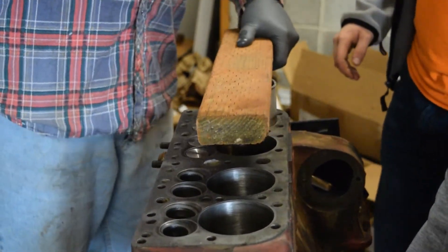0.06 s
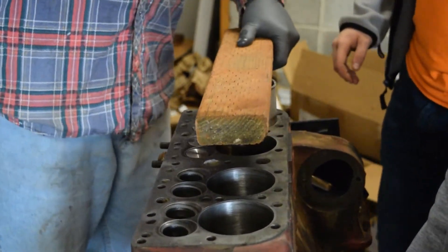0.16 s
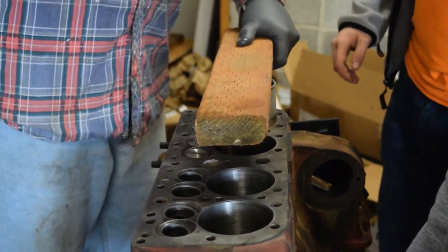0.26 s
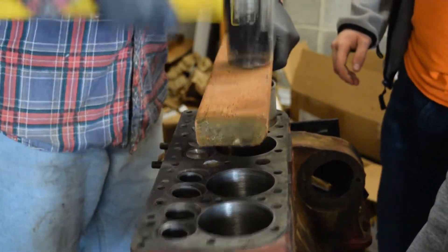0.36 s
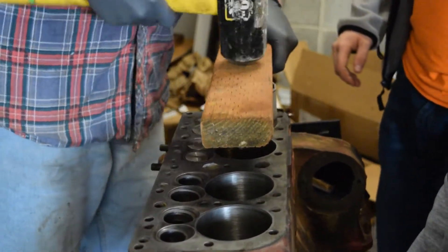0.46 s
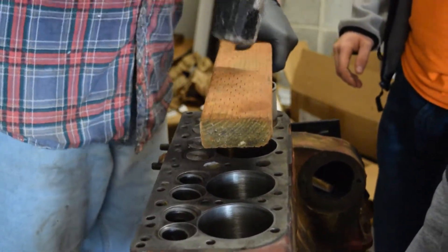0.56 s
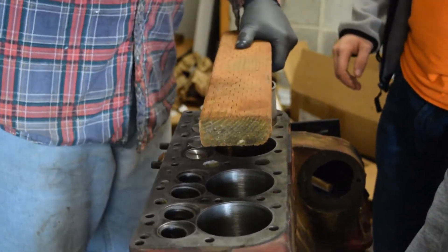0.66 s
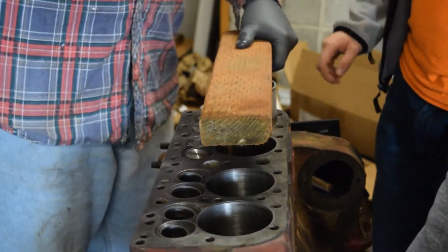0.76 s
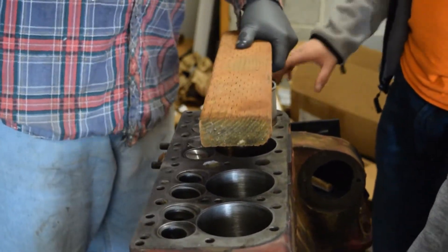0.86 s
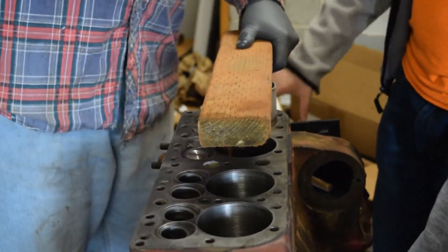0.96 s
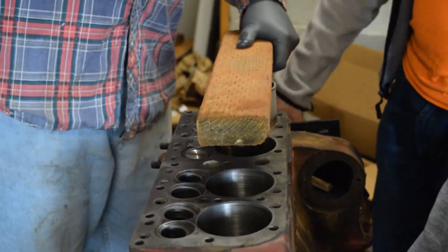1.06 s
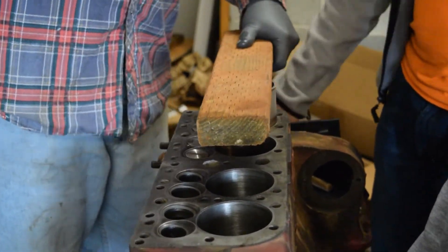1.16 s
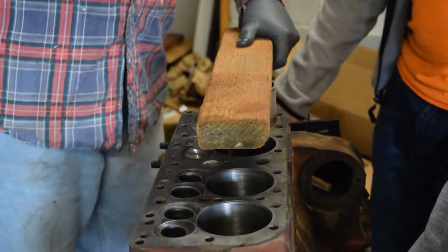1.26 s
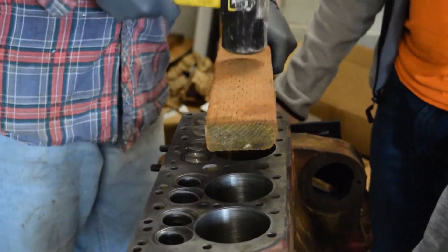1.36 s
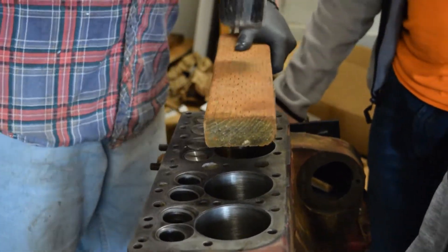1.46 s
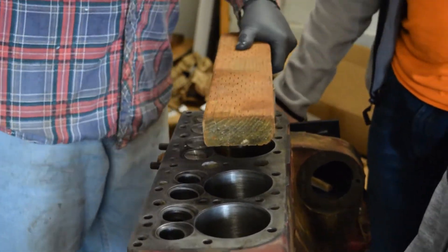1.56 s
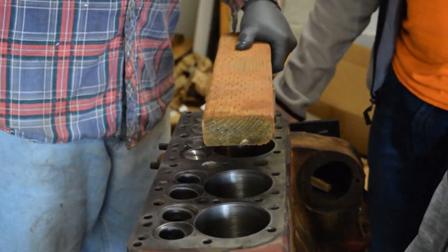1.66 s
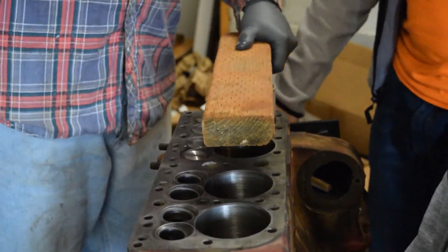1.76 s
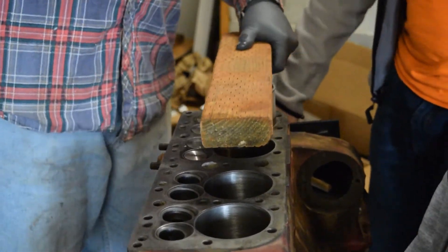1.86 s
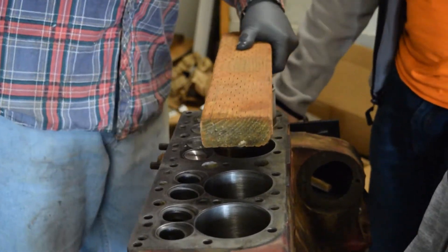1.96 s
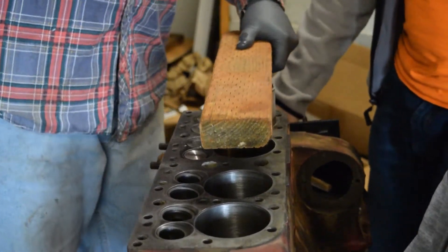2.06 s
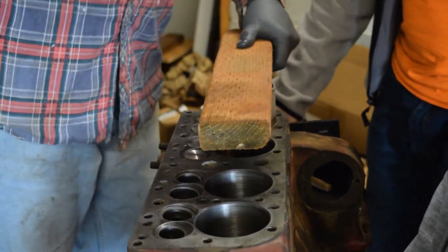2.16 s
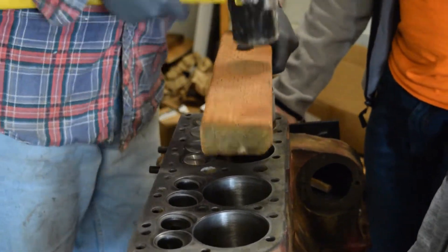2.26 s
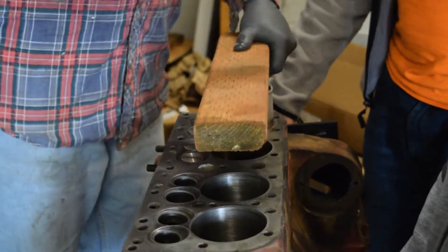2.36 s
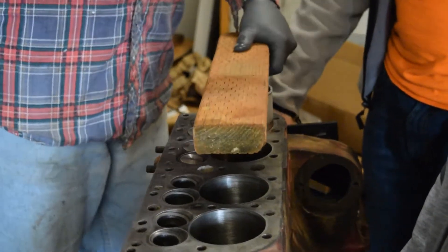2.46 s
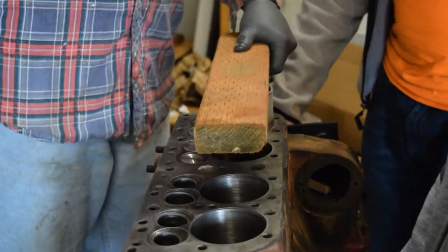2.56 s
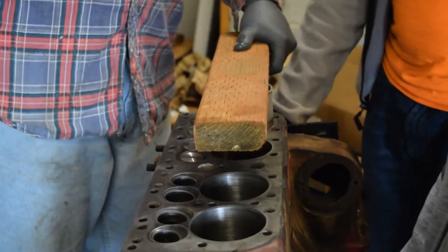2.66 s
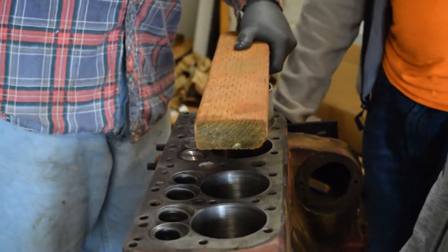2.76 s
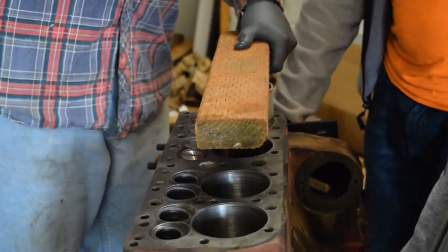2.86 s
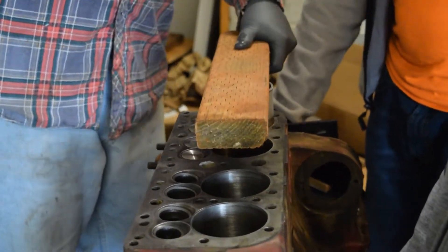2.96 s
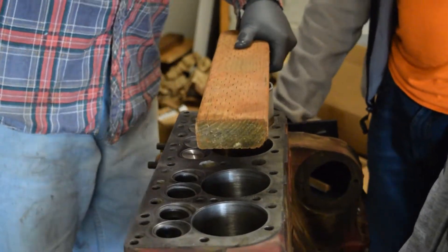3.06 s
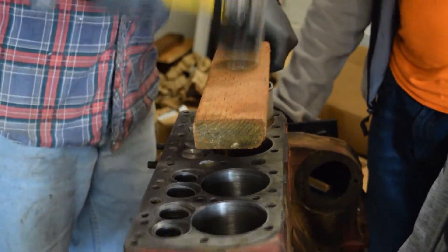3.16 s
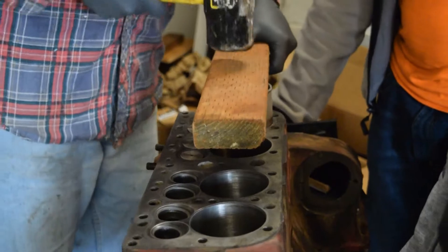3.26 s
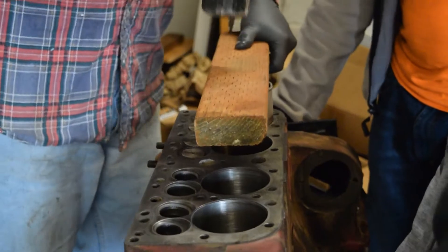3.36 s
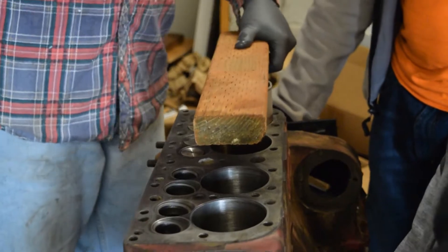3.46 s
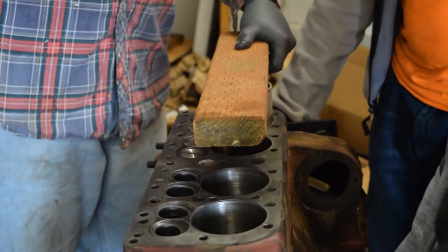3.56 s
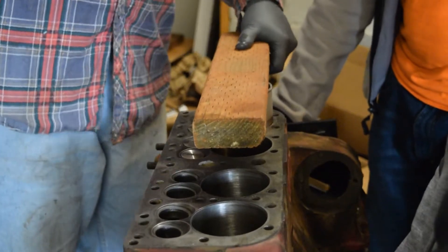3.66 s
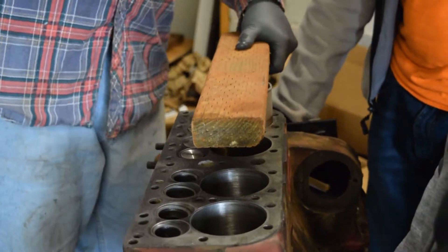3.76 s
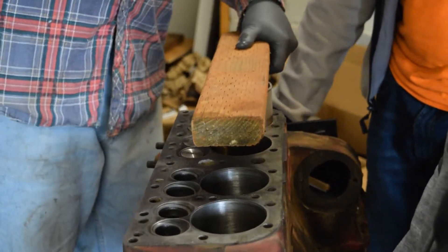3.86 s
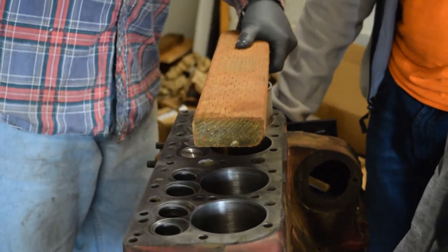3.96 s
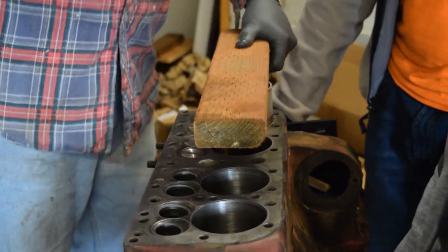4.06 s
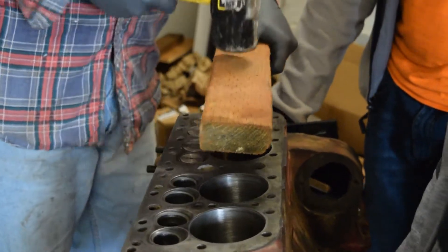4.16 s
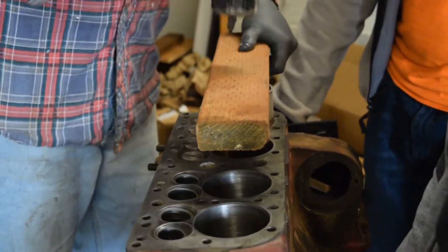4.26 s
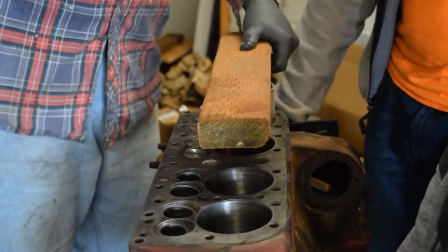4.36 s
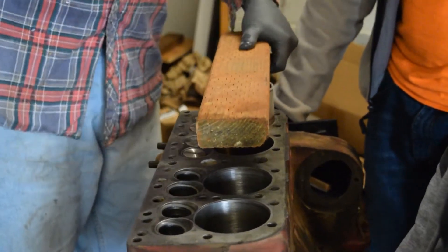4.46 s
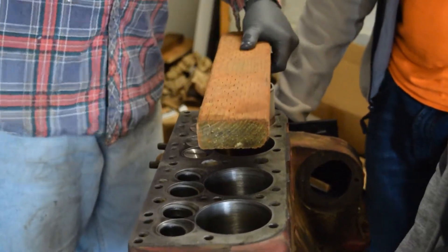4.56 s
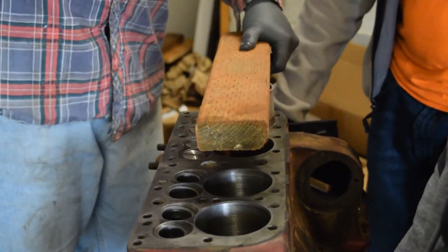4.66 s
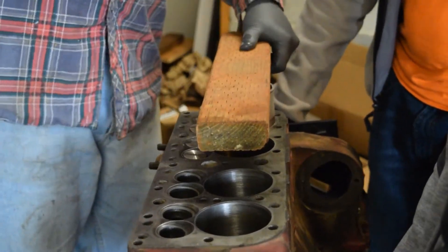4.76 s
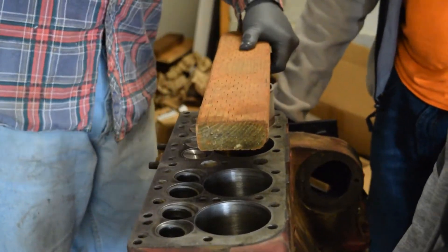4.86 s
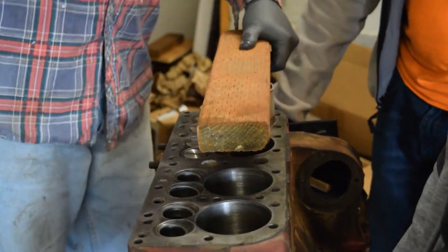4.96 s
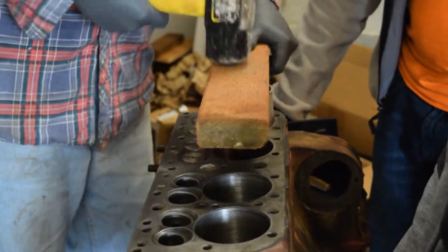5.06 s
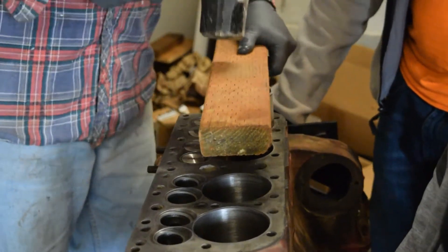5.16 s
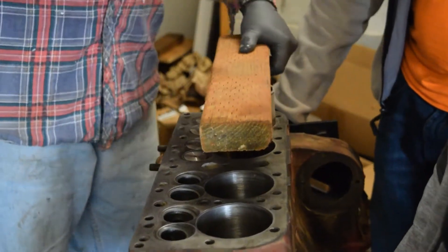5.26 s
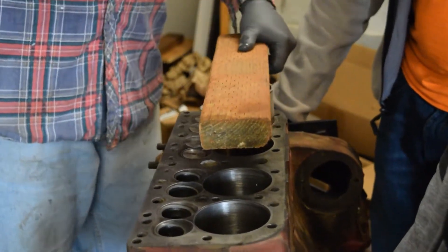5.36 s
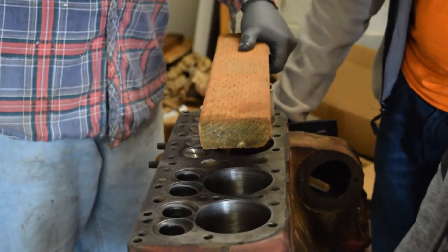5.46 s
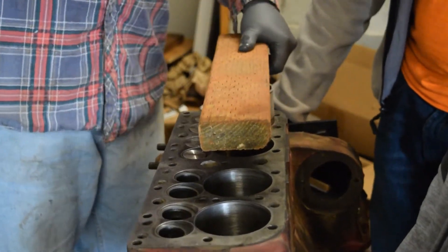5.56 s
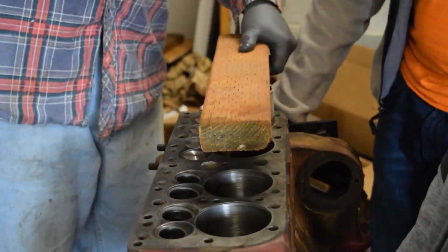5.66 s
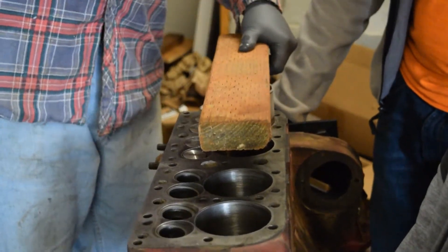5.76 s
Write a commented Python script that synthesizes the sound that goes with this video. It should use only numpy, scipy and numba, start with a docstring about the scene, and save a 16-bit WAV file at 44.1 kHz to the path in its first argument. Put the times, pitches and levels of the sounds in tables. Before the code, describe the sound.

A heavy hammer steadily strikes wood on an iron engine block, each loud, distorted knock clanging and decaying in a hard-walled room.

```python
"""Hammer blows on an engine block.

A heavy hammer drives a sleeve into a cast-iron block through timber: six blows and the tail of an earlier one.
Each knocks the timber (modes), slips the sleeve (noise burst), rings the iron (modes), fills the hard-walled
workshop (decaying noise). Metal clinks (high modes), cloth rustles and air are noise or modes too; a far
machine coasts down (sliding sines). The close microphone clips on blows until its gain control catches up."""
import sys
import numpy as np
from scipy import signal
from scipy.fft import rfft, irfft
from scipy.io import wavfile
from numba import njit

SR = 44100
rng = np.random.default_rng(int(sys.argv[2]) if len(sys.argv) > 2 else 0)


def unload_wav(signal):
    """Save mono or channel-first audio to the path in sys.argv[1] as 16-bit WAV at rate SR, clipped to [-1, 1]."""
    wavfile.write(
        sys.argv[1],
        SR,
        np.round(np.clip(np.atleast_2d(signal).T, -1, 1) * 32767).astype(np.int16),
    )


N = 256645
TIME = np.arange(N) / SR
AGE = TIME[:64000]  # time since a hit, s


def undb(db):
    """Decibels to gain."""
    return 10 ** (np.asarray(db) / 20)


def along(table, hz):
    """Interpolate (f/Hz, value) points on a log-frequency axis."""
    f, value = np.transpose(table)
    return np.interp(np.log(hz + 1), np.log(f), value)


def shape(x, colour):
    """Filter x by a (f/Hz, gain/dB) curve, zero phase."""
    hz = np.fft.rfftfreq(len(x), 1 / SR)
    return irfft(rfft(x) * undb(along(colour, hz)), len(x))


def colour_of(hit, colour):
    """Filter a hit, zero-padded so that its attack does not wrap round."""
    padded = np.pad(hit, (0, len(hit)))
    return shape(padded, colour)[:len(hit)]


def noise(colour, size):
    """Coloured noise of rms 1."""
    x = shape(rng.standard_normal(size), colour)
    return x / x.std()


def fade(t60_s):
    """Exponential decay: 60 dB in t60_s."""
    return np.exp(-np.log(1000) * AGE / t60_s)


def ring(modes):
    """Sum of decaying sines (f/Hz, level/dB, t60/s), random phase."""
    total = 0
    for hz, db, t60_s in modes:
        phase_turns = rng.random()
        total = total + undb(db) * fade(t60_s) * np.sin(2 * np.pi * (hz * AGE + phase_turns))
    return total


def add(out, start_s, x):
    """Mix x in from start_s; drop what falls outside."""
    start = int(start_s * SR)
    x, start = x[max(-start, 0):], max(start, 0)
    out[start:start + len(x)] += x[:N - start]


# hammer blows: t/s, force/dB, knock/dB, slip/s, body/dB, middle/dB, brightness/dB, three long rings/dB each
STROKES = [(-0.53, 0.5, 0, 0.008, 9.5, 6.5, -5, -1.5, -14, -3.5),
           (0.4045, 0.75, -1.5, 0.0054, -5.5, 0, 1, -3, 11.5, 5),
           (1.3516, -0.84, 0, 0.0068, -1.5, 1.5, 3, -3.5, 7.5, 7.5),
           (2.2651, -1.05, -0.5, 0.0067, -2, 3, -6.5, 3, 3.5, 10),
           (3.2114, -2.5, -2.5, 0.009, -1.5, 2, 0.5, -2, -14.5, -5),
           (4.1580, 0.3, -2.9, 0.0056, 2, -0.5, -1, 1, -12, -6.5),
           (5.0880, -1, -1.5, 0.008, -4.5, 1.5, 2, -8.5, -4.5, 3)]


def add_blows(out):
    """All blows share one casting ripple; the first starts before t = 0, so only its tail is heard."""
    ripple = casting_ripple()
    for t_s, *stroke in STROKES:
        add(out, t_s, blow(ripple, *stroke))


def blow(ripple, force_db, knock_db, slip_s, body_db, middle_db, bright_db, *ring_db):
    """Timber knocks, sleeve slips, block thumps, iron clangs, room answers; force scales the sum."""
    toned = timber_knock(knock_db) + iron_clang() + room_answer(ripple)
    # soft contact feeds the lows, hard contact the treble: f/Hz, gain/dB
    tint = [(250, 0), (450, body_db), (650, body_db), (850, middle_db), (1200, middle_db),
            (1500, 0), (1900, bright_db), (3200, 0)]
    struck = colour_of(toned, tint)
    return undb(force_db) * (sleeve_crack(slip_s) + block_thump() + struck + long_rings(ring_db))


# timber modes: f/Hz, level/dB, t60/s
TIMBER_MODES = [(335, -20, 0.052), (614, -1.5, 0.29), (857, 10.5, 0.033), (1067, -4, .08),
                (1412.5, 2, 0.13), (1742, -1.5, 0.12)]


def timber_knock(knock_db):
    """Damped modes of the struck timber."""
    return undb(3 + knock_db) * ring(TIMBER_MODES)


# slipping sleeve: f/Hz, relative density/dB per Hz
SLIP_COLOUR = [(300, -7.5), (1800, 0.5), (5000, -1), (15000, -12)]


def sleeve_crack(slip_s):
    """Short harsh slip: noise held about slip_s, then cut by a fourth-power exponential."""
    envelope = np.exp(-(AGE / slip_s) ** 4)
    return undb(3) * noise(SLIP_COLOUR, len(AGE)) * envelope


# block thump: f/Hz, relative density/dB per Hz
BLOCK_COLOUR = [(25, -0.5), (100, -0.5), (200, -8.5), (700, -40.5)]


def block_thump():
    """Low noise with a short exponential decay."""
    return undb(-7.5) * noise(BLOCK_COLOUR, len(AGE)) * fade(0.07)


# damped block modes: f/Hz, relative level/dB
IRON_MODES = [(258, -18.5), (312, -17), (441, -8), (555, -8), (620, -8.5), (673, -9), (845, -11.5),
              (1097, -14), (1174, -10), (1217, -7.5), (1324, -2.5), (1442, -2), (1508, -4.5), (1766, -3),
              (1807, -2.5), (1857, -3), (1909, -3.5), (2053, -3.5), (2505, -10), (2789, -16.5), (3090, -14),
              (3450, -12.5), (4081, -18.5), (4242, -15.5), (4689, -14.5), (5179, -18), (5728, -18.5),
              (6024, -24), (7461, -30), (8980, -31)]
IRON_T60_S, IRON_KNEE_HZ, IRON_DAMPING_POWER = 0.65, 1810, 0.093
IRON_SCATTER_DB = 3


def iron_clang():
    """Timber seats anew per blow, so mode levels scatter; t60 falls as a power of f above the knee."""
    modes = []
    for (hz, db), share in zip(IRON_MODES, rng.standard_normal(len(IRON_MODES))):
        t60_s = IRON_T60_S * min(1, IRON_KNEE_HZ / hz) ** IRON_DAMPING_POWER
        modes.append((hz, db + IRON_SCATTER_DB * share, t60_s))
    return undb(-5.5) * ring(modes)


# long iron rings: f/Hz, level/dB, t60/s
LONG_RINGS = [(1614, -15, 1.18), (1664, -21, 1.04), (2199, -24.5, 1.85)]


def long_rings(ring_db):
    """Slow-decaying iron modes, level set per blow."""
    return ring([(hz, db + own_db, t60_s) for (hz, db, t60_s), own_db in zip(LONG_RINGS, ring_db)])


def casting_ripple(count=520, ripple_db=3.0):
    """Crowded upper modes as a random (f/Hz, gain/dB) curve, 0 dB at both ends."""
    hz = np.linspace(SR / 20, SR / 3, count)
    gain_db = ripple_db * np.pad(rng.standard_normal(count - 2), 1)
    return np.column_stack([hz, gain_db])


# room's answer to a blow: f/Hz, relative density/dB per Hz
ROOM_COLOUR = [(40, -66.5), (120, -23.5), (200, -29), (270, -18), (450, -4), (950, -7), (1350, 0.5),
               (1900, 1.5), (2400, -8.5), (4500, -18), (9000, -30.5), (15000, -46)]


def room_answer(ripple):
    """Reverberant noise in the blow's colour, rippled by the casting."""
    excitation = shape(noise(ROOM_COLOUR, len(AGE)), ripple)
    return undb(6.5) * reverberate(excitation)


# workshop decay: f/Hz, t60/s
ROOM_DECAY = [(60, 0.2), (250, 0.62), (600, 0.55), (1700, 0.64), (4500, 0.61), (9000, 0.47), (15000, 0.19)]


def reverberate(excitation):
    """Dense reflections: overlapping bands of noise, each decaying at the room's t60."""
    spectrum = rfft(excitation)
    hz = np.fft.rfftfreq(len(AGE), 1 / SR)
    centres_hz = [f for f, _ in ROOM_DECAY]
    total = 0
    for (_, t60_s), row in zip(ROOM_DECAY, np.eye(len(centres_hz))):
        share = along(np.column_stack([centres_hz, row]), hz)
        total = total + irfft(spectrum * share) * fade(t60_s)
    return total


# light metal clinks: t/s, level/dB, treble/dB
CLINK_HITS = [(0.200, -25, -18.5), (0.3117, -33.5, 12.5), (0.555, -1.5, 13), (0.7444, -25.5, 26),
              (1.3082, -3.5, 8.5), (1.8353, -28, 23), (2.1446, -2, 9.5), (2.23, -7.5, 6), (2.887, -10.5, 7),
              (3.0081, -12, 5.5), (3.065, -23.5, -11.5), (4.317, -12.5, 34.5)]


def add_clinks(out):
    """Mix in every clink."""
    for t_s, db, treble_db in CLINK_HITS:
        add(out, t_s, clink(db, treble_db))


# clinking metal modes: f/Hz, relative level/dB, t60/s
METAL_MODES = [(3370, -4.5, 0.67), (3710, -10, 0.35), (3780, 2.5, .35), (4322, 0.5, 0.35), (4549, -8, 0.25),
               (5658, -10.5, 0.2), (6718, -14.5, 0.16), (7197, -9.5, 0.16)]
# clink tick and its reverberation: f/Hz, relative density/dB per Hz
METAL_COLOUR = [(1500, -37), (2800, -9), (3300, 3), (4000, 6.5), (4800, -6), (6000, -4.5), (8000, -14.5),
                (14000, -37)]


def clink(db, treble_db):
    """Metal touches metal: noise tick, high modes, reverberation."""
    tick = undb(-40.5) * noise(METAL_COLOUR, len(AGE)) * fade(0.019)
    modes = undb(-35) * ring(METAL_MODES)
    room = undb(-31.5) * reverberate(noise(METAL_COLOUR, len(AGE))) * fade(1.0)
    treble = [(6500, 0.5), (9000, treble_db), (13000, treble_db), (16000, -3)]
    return undb(db) * colour_of(tick + modes + room, treble)


SWING_LEAD_S, SWING_S, SWING_DB = 0.2, 0.34, -52


def add_swings(out):
    """One rustle around each blow."""
    for t_s, *_ in STROKES:
        add(out, t_s - SWING_LEAD_S, swing())


def swing():
    """Shirt sleeve rustles as the arm comes down: noise under a Hann window."""
    size = int(SWING_S * SR)
    cloth = [(500, -22.5), (2500, 0.5), (8000, -6.0), (15000, -15.5)]
    return undb(SWING_DB) * np.hanning(size) * noise(cloth, size)


# hum orders 1-3 in turn, broad resonances: level at centre/dB, centre f/Hz, width/Hz
HUM_RESONANCES = [(-60, 122, 14), (-55, 231, 10), (-61, 360, 110)]
START_SHAFT_HZ, COAST_S = 128, 31  # COAST_S: time to slow by a factor e


def machine():
    """Distant rotor coasts down; each hum order swells and fades as it slides through its resonance."""
    shaft_hz = START_SHAFT_HZ * np.exp(-TIME / COAST_S)
    turns = np.cumsum(shaft_hz) / SR
    hum = np.zeros(N)
    for order, (db, centre_hz, width_hz) in enumerate(HUM_RESONANCES, 1):
        detuning = 2 * (order * shaft_hz - centre_hz) / width_hz
        hum += undb(db) / np.hypot(1, detuning) * np.sin(2 * np.pi * order * turns)
    return hum


# still workshop air: f/Hz, relative density/dB per Hz
AIR_COLOUR = [(30, -43.5), (100, -13.5), (200, -12), (400, 1.5), (800, -3), (1700, -5.5), (3000, -13),
              (6000, -21), (10000, -25.5), (15000, -38.5)]


def still_air():
    """Steady coloured noise."""
    return undb(-53.5) * noise(AIR_COLOUR, N)


def scene():
    """Blows, clinks, rustles, machine and air in one channel."""
    out = still_air() + machine()
    add_blows(out)
    add_clinks(out)
    add_swings(out)
    return out[None]


@njit
def gain_control(x, limit, attack, release):
    """Clip at +-1; output above limit turns the gain down, then it creeps back to 1."""
    out, gain = np.empty(len(x)), 1.
    for i in range(len(x)):
        out[i] = min(1., max(-1., x[i] * gain))
        excess = max(0., abs(out[i]) - limit)
        gain = min(1., gain * (1 + release - attack * excess))
    return out


def record(dry, attack_s=0.0018, release_s=0.061, limit_db=-3, top_hz=15900):
    """Attacks clip flat until the gain has come down; an elliptic low-pass then cuts the top."""
    limit = float(undb(limit_db))
    clipped = gain_control(dry[0], limit, 1 / (attack_s * SR), 1 / (release_s * SR))
    low_pass = signal.ellip(10, 0.1, 60, top_hz, fs=SR, output="sos")
    return signal.sosfilt(low_pass, clipped[None])


dry = scene()
out = record(dry)
unload_wav(out)
```